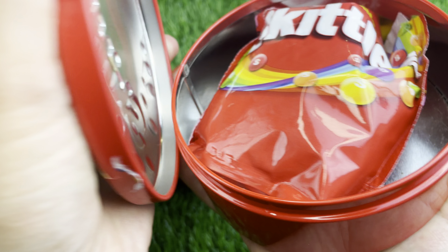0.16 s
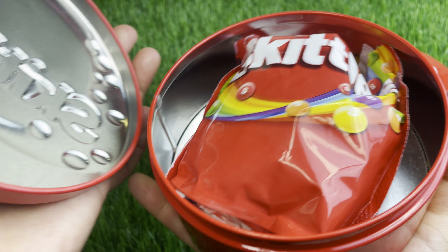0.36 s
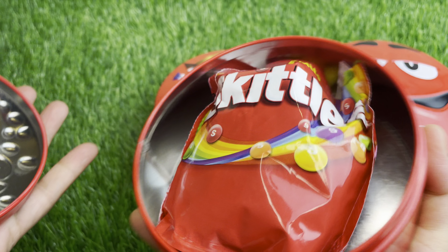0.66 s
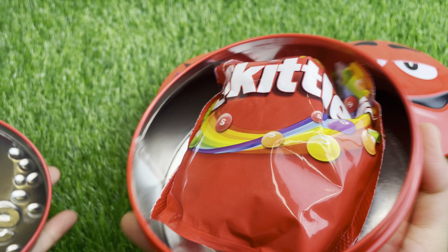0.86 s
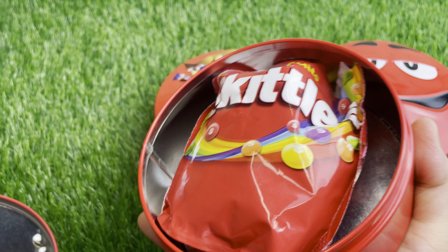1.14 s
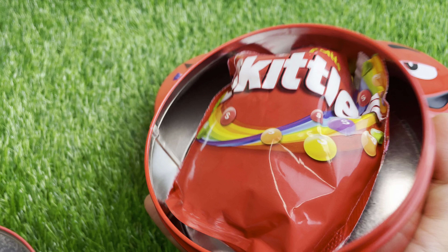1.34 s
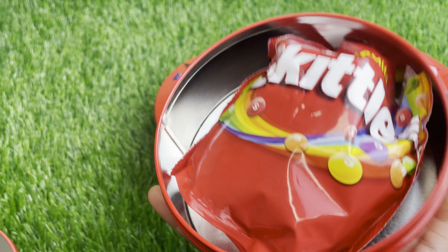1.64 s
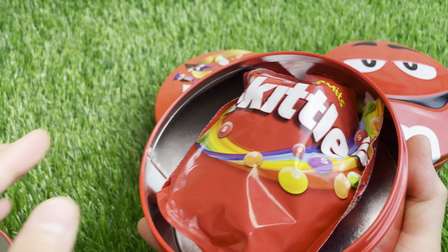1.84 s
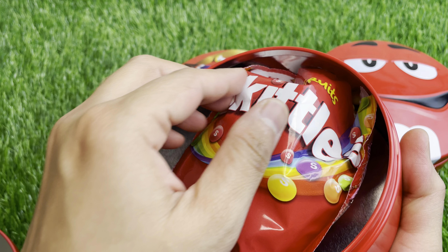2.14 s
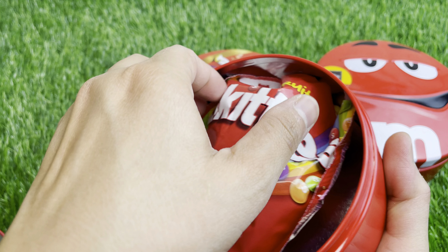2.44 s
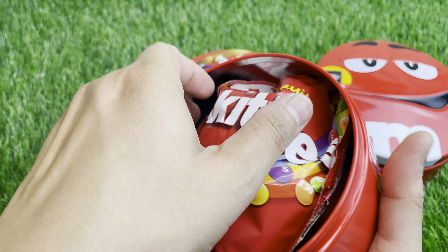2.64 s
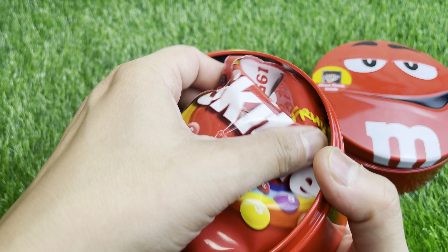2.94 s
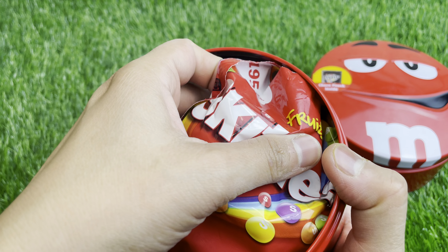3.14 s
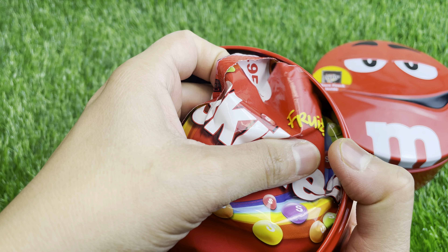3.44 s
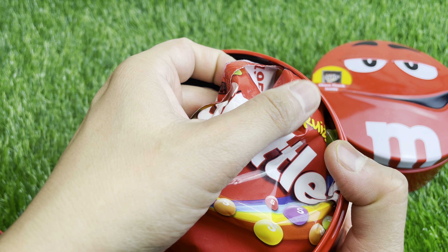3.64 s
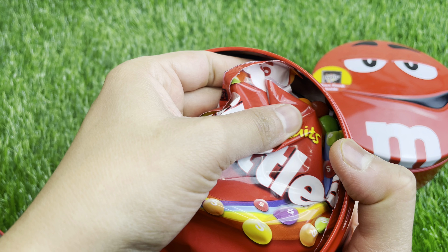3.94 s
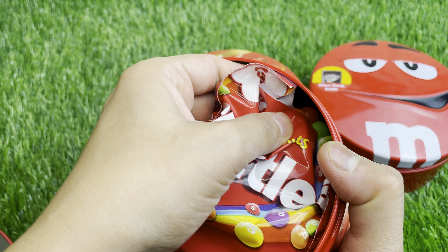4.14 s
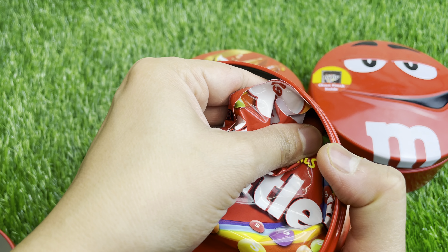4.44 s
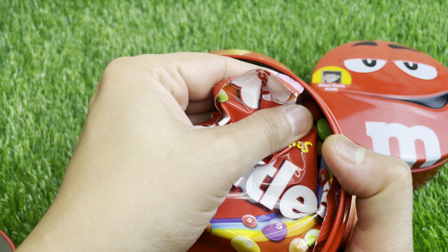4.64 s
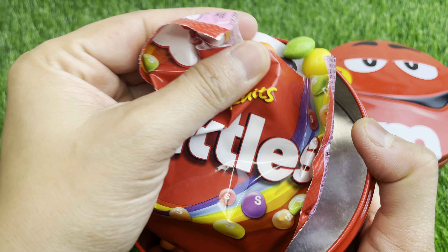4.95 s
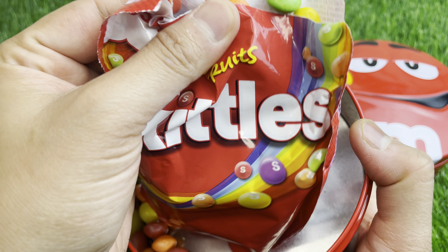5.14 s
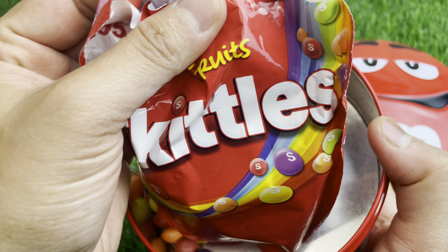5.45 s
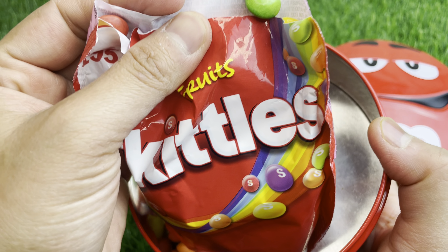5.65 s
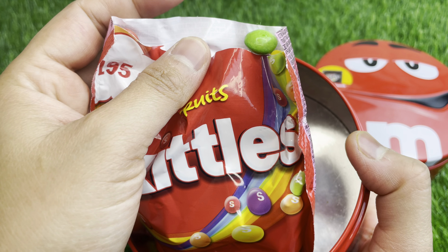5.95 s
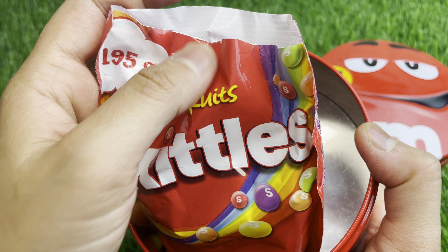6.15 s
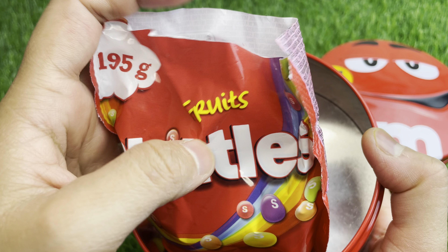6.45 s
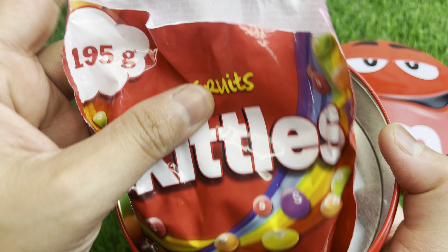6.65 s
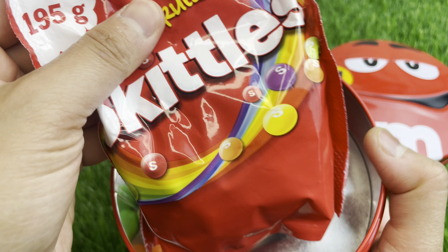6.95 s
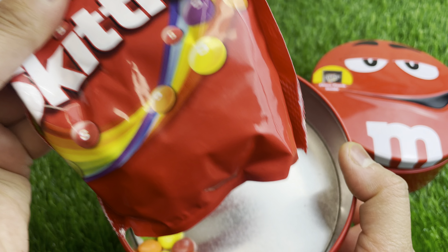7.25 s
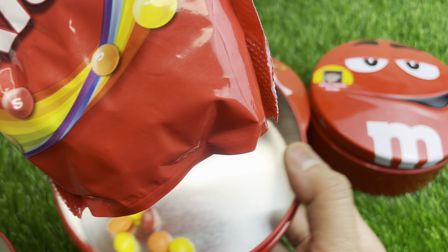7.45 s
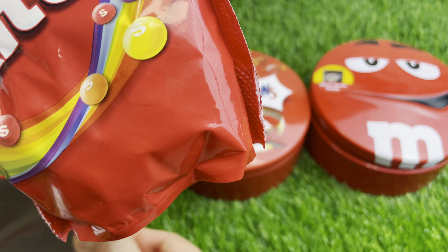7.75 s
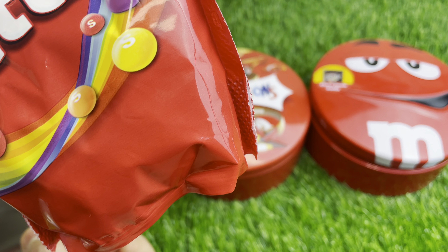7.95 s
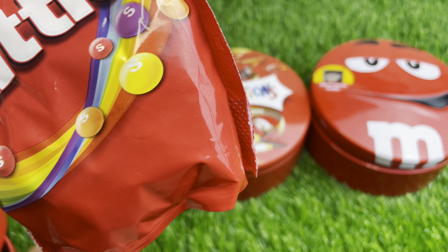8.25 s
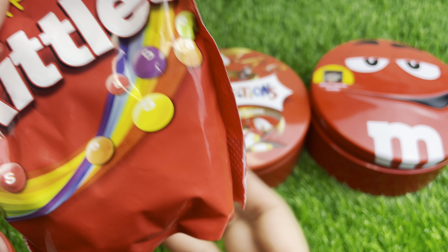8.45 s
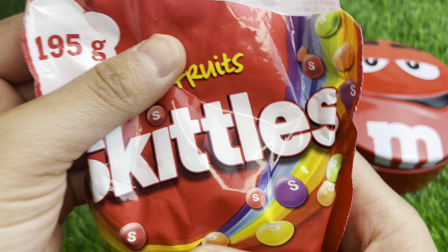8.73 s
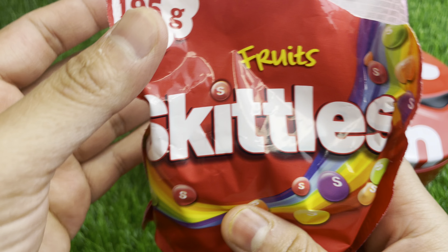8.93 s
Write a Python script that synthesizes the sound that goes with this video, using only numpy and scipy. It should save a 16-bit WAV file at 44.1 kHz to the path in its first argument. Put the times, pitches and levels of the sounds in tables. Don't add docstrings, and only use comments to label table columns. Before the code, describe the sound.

Very close in a small quiet room, a bag of hard sweets shifts in soft lumpy rustles inside a metal tin. After a near lull, squeezing makes dense sharp film snaps and hollow air pops. Sparser crinkles follow as the bag lifts, then sweets ping, clatter and briefly roll on the tin, with a few last crackles.

```python
import sys
import numpy as np
from scipy import signal
from scipy.fft import rfft, irfft, next_fast_len
from scipy.io import wavfile
from scipy.ndimage import uniform_filter1d

SR = 44100
rng = np.random.default_rng(int(sys.argv[2]) if len(sys.argv) > 2 else 0)


def volts(x):
    e = np.asarray(x, float) / 20
    return 10 ** e


def transcribe(u):
    v = np.clip(np.atleast_2d(u).T, -1, 1)
    q = np.round(v * 32767).astype(np.int16)
    wavfile.write(sys.argv[1], SR, q)


N = 400869

# [f/Hz, level/dB per Hz]
ROOM_TONE = [(18, -15), (30, 1), (81, 2), (141, -19), (616, -61.5), (1500, -56), (12600, -46), (16000, -75)]
# [f/Hz, level/dB per Hz]
RUB_COLOUR = [(20, -15), (60, -2.5), (110, 0.5), (250, -6), (420, -2), (900, -33)]
# [start t/s, hold t/s, level/dB]
RUBS = [(0, 0.3, -56), (0.453, 0.59, -50.5), (1.53, 0.23, -48), (2.47, 0.19, -53.5), (4.607, 1.6, -63),
        (5.47, 0.05, -47.5), (6.235, 0.038, -42), (6.583, 0.038, -36), (7, 1.9, -68), (8.817, 0.033, -43.5),
        (9.063, .03, -41)]
# [f/Hz, fall by 60 dB t/s]
ROOM_DECAY = [(300, 0.25), (2000, 0.17), (12000, 0.03)]
# [f/Hz, phase/rad]
LEFT_LEAD = [(700, .5), (1600, 2.4), (3600, 3.1), (4740, 7.4), (6550, 11.7), (7900, 9.7), (9300, 9.2),
             (13600, 6.3)]
# [f/Hz, level/dB]
LEFT_LOUDER = [(60, 2), (180, 3), (550, 7), (1000, 6), (2400, 1.5), (8000, 3), (9300, 0)]
# [f/Hz, width/Hz, depth 0-1]
HOUSING_DIPS = [(2200, 300, .3), (4000, 300, .35), (5600, 330, .62), (7500, 500, .25)]

# [t/s, level/dB, f/Hz]
THUMPS = [(0.512, -32, 420), (1.681, -34, 352), (1.879, -36.5, 493), (2.803, -39, 247), (3.084, -30.5, 340),
          (4.769, -38, 364), (4.83, -35.5, 456), (5.021, -31.5, 355), (5.239, -34.5, 374),
          (5.44, -36.5, 335), (5.583, -39.5, 370), (5.833, -38.5, 445), (5.933, -36, 353),
          (5.947, -41, 396), (6.603, -28, 410), (8.214, -31.5, 363), (8.867, -32, 348), (8.961, -38, 333),
          (9.051, -35, 330)]
# [t/s, rim level/dB, base level/dB re rim, wall level/dB re rim, fall by 60 dB t/s]
CLATTER = [(4.3314, -27, -8, -11, 0.09), (5.048, -42, -15, -15, 0.047), (6.7477, -37.5, -7, 6.5, 0.034),
           (6.915, -32.5, -22, -10, 0.068), (7.184, -29, -16, -12, 0.093), (7.481, -32, -20, -21, 0.065),
           (7.5434, -24, -29, -9, 0.061), (7.664, -33.5, -25, -19, 0.092), (7.731, -23.5, -40, -15, 0.076),
           (7.916, -27, -25, -18, .06), (7.9524, -26.5, 13.5, 0.5, 0.13), (7.9676, -38.5, 12, 14.5, 0.062),
           (8.02, -31.5, 12, 7, 0.12), (8.172, -31.5, 5, 5.5, 0.097), (8.2204, -24.5, 17.5, -2.5, 0.11),
           (8.2588, -30.5, 14, -11, 0.027), (8.455, -29.5, -6, -7.5, 0.085), (8.5223, -35, -7, -12.5, 0.13)]
# [start t/s, hold t/s, rim level/dB, base level/dB re rim]
ROLLS = [
    (6.734, 0.024, -47, -26),
    (7.454, 0.1, -44, -35),
    (7.852, 0.041, -32.5, -33),
    (8.12, 0.35, -46, 6),
    (8.46, 0.19, -53.5, -4),
    (8.72, 0.023, -52, -1),
]
# [f/Hz, width/Hz, level/dB]
RIM_MODES = [(861, 110, -16), (1880, 70, -17), (2760, 25, -9), (2868, 26, 1), (2960, 25, -3)]
# [f/Hz, width/Hz, level/dB]
BASE_MODES = [(363, 19, -4), (1062, 40, 3.5), (1370, 29, 17), (1510, 76, 6.5), (1600, 33, 0.5)]
# [f/Hz, width/Hz, level/dB]
WALL_MODES = [(1780, 28, -3), (2140, 42, 2.5), (2496, 38, 3), (2675, 39, 2.5), (2740, 23, -2.5),
              (3147, 41, 2.5), (3920, 60, 0), (6810, 48, -9)]
# [f/Hz, width/Hz, level/dB]
LOADED_BASE_MODES = [(1330, 32, 2), (1800, 65, -2), (2464, 37, -11), (3230, 60, -6)]
# [f/Hz, width/Hz, level/dB]
TILTED_BASE_MODES = [(1286, 44, 3), (1590, 68, 2), (1880, 60, -3.5), (2790, 46, -1.5)]
# [t/s, level/dB, f/Hz]
PINGS = [(4.333, -23.5, 2760), (4.397, -35, 2637), (5.05, -38, 2767), (5.265, -44, 2800),
         (6.914, -35, 2790), (7.545, -26, 2930), (7.556, -34, 2865), (7.733, -20, 2866), (7.844, -43, 2880),
         (7.893, -35, 2890), (7.953, -16, 1504), (7.953, -21, 2756), (7.954, -22, 3143), (7.968, -27, 2150),
         (8.018, -31, 3910), (8.04, -29, 2670), (8.15, -25, 2400), (8.224, -14.5, 1375), (8.225, -16, 2190),
         (8.39, -33, 1590), (8.455, -27, 2858), (8.521, -28, 2831), (8.522, -30, 1553), (8.55, -36, 2976),
         (8.694, -31.5, 2847)]
# [start t/s, length t/s, from f/Hz, to f/Hz, level/dB]
SWEEPS = [
    (8.041, 0.17, 2626, 2456, -36),
    (8.279, .2, 1383, 1627, -39),
]

# [f/Hz, level/dB per Hz]
FILM_COLOUR = [(800, -20.5), (3530, -13.5), (6400, -6.5), (7510, -8.5), (8960, -2), (12900, -1.5),
               (15300, -16), (16600, -42)]
# [f/Hz, level/dB]
BODY_COLOUR = [(1000, -51), (1400, -1), (2000, 2), (2600, 3), (4000, 0), (5500, -6.5), (6800, -6),
               (8000, -54)]
# [f/Hz, width/Hz, level/dB]
HOLLOW_MODES = [(395, 400, -9.5), (856, 254, 1), (1106, 400, -1)]
# [t/s, level/dB re body]
HOLLOW_ANSWER = [(2.4, 1.5), (3.0, 2.5), (3.4, -3.5), (3.95, -14.5), (4.3, 5.5), (5.1, 11.5), (5.35, 4),
                 (7.45, -5.5), (7.75, -15), (8.5, -16), (9.09, -1.5)]
# [start t/s, hold t/s, film level/dB, body level/dB re film]
GRIPS = [(0, 0.007, -52.5, -2), (0.207, 0.32, -57, 7.5), (0.526, 0.55, -36, -2), (1.242, 0.38, -51, 4),
         (1.535, 0.01, -25, -0.5), (1.674, 0.086, -32.5, -2), (1.849, 0.051, -60, 11),
         (2.16, 0.16, -59.5, 3.5), (2.449, 0.56, -50.5, 5.5), (2.921, .14, -41.5, 3),
         (3.142, 0.44, -44.5, 9), (3.56, 0.2, -30, 1.5), (3.751, 0.44, -41, 4.5), (4.302, 0.3, -69.5, 9),
         (4.688, 0.44, -50, -1.5), (5.22, 0.23, -66, 4), (5.454, 0.071, -37.5, -3.5), (5.69, 0.7, -55.5, 4),
         (6.582, 0.03, -32.5, 1.5), (6.69, 0.6, -44.5, -0.5), (7.409, 0.12, -43, 6.5),
         (7.815, 0.18, -40.5, 2), (7.624, 0.58, -54, 6), (8.018, 0.24, -42, 8.5), (8.252, 0.29, -51, 9.5),
         (8.531, 0.0091, -33, 2), (8.808, 0.18, -45, 0.5)]
# [t/s, peak level/dB, fall by 60 dB t/s]
SLIDES = [(0.039, -37.5, 0.036), (0.185, -26.5, 0.2), (0.2415, -32.5, 0.14), (0.3224, -26, 0.083),
          (0.366, -28, 0.39), (0.449, -19.5, 0.21), (0.515, -27, 0.11), (0.553, -19.5, 0.031),
          (0.5844, -13, 0.1), (0.6514, -20.5, 0.39), (0.686, -19.5, 0.21), (0.733, -24, 0.15),
          (0.787, -26, 0.083), (0.815, -21.5, 0.085), (0.852, -17.5, 0.15), (0.884, -14.5, 0.033),
          (0.924, -29.5, 0.29), (0.956, -27.5, 0.16), (1.014, -18, 0.11), (1.24, -25, 0.13),
          (1.301, -32, 0.67), (1.346, -25.5, 0.088), (1.44, -27, 0.36), (1.4974, -34, 0.081),
          (1.539, -15.5, 0.072), (1.573, -12.5, 0.052), (1.674, -28, 0.37), (1.7076, -21.5, 0.19),
          (1.734, -19, 0.2)]
# [t/s, level/dB, f/Hz]
POPS = [(2.197, -14, 996), (2.361, -13, 1240), (2.455, -18, 1110), (2.628, -13.5, 960), (2.936, -19, 880),
        (2.99, -16.5, 910), (3.009, -20, 850), (3.044, -19, 840), (3.062, -18.5, 860), (3.085, -15.5, 800),
        (3.214, -13.5, 810), (3.255, -7, 875), (3.297, -18, 846), (3.337, -10.5, 800), (3.382, -11, 780),
        (3.405, -16, 972), (3.432, -12.5, 880), (3.444, -10, 875), (3.468, -14.5, 900), (3.601, -13, 850),
        (3.624, -13, 850), (3.667, -22, 859), (3.692, -16, 830), (3.711, -13, 890), (3.761, -16, 880),
        (3.79, -14, 850), (3.803, -6.5, 860), (3.895, -10.5, 746), (3.953, -13, 795), (3.975, -17, 870),
        (4.675, -19, 905), (4.778, -14, 960), (4.789, -15.5, 860), (4.837, 1.5, 870), (5.024, -9, 870),
        (5.03, -10.5, 850), (5.044, -16, 816), (5.052, -13, 905), (5.245, -18, 965), (5.773, -21.5, 1050),
        (6.251, -22, 934), (6.466, -24, 1220), (6.56, -16, 970), (6.595, -10, 970), (6.672, -16.5, 980),
        (6.795, -19, 910), (7.668, -17, 910), (8.776, -19, 1030)]
# [t/s, level/dB, f/Hz]
PIPS = [(0.522, -17, 1014), (0.66, -15.5, 1090), (0.793, -16, 1140), (0.927, -16.5, 980),
        (2.197, -13.5, 2070), (2.361, -19, 2000), (2.628, -9.5, 1880), (2.691, -21, 3200),
        (2.715, -16.5, 1800), (3.255, -17, 1500), (3.299, -17, 1700), (3.338, -8.5, 1630),
        (3.382, -12, 1600), (3.405, -10, 1600), (3.445, -8.5, 1600), (3.602, -10, 1550), (3.628, -16, 1430),
        (3.67, -16, 1420), (3.742, -17, 1330), (3.804, -14, 1370), (3.906, -18, 1530), (4.04, -18, 1450),
        (4.06, -15.5, 1510), (4.102, -16, 1410), (4.331, -19, 1460), (5.047, -20, 1340),
        (6.892, -15.5, 1970), (6.999, -19, 2930), (7.185, -24, 1980)]
# [t/s, peak level/dB]
NICKS = [(.430, -25), (1.168, -31.5), (1.430, -27), (1.645, -25), (1.874, -28), (1.885, -26.5),
         (1.931, -34.5), (1.954, -38.5), (2.011, -45), (2.187, -41), (2.456, -31), (2.848, -21),
         (4.067, -15), (4.080, -21), (4.725, -34), (4.750, -30), (5.108, -29), (5.336, -45), (5.433, -30),
         (5.483, -24.5), (5.500, -26), (5.557, -27), (5.5948, -23), (5.714, -35), (5.751, -33),
         (5.875, -40), (5.949, -29), (6.037, -31), (6.097, -32), (6.250, -33), (6.291, -27), (6.366, -27),
         (6.431, -34.5), (6.497, -20), (6.559, -21.5), (7.155, -28), (7.338, -37), (8.546, -21),
         (8.775, -33), (8.830, -27), (8.860, -23), (8.952, -28)]
# [t/s, peak level/dB, fall by 60 dB t/s]
TICKS = [(2.465, -7.5, 0.013), (2.4986, -29, 0.015), (2.5545, -46, 0.024), (2.747, -48, 0.0083),
         (2.82, -23, 0.039), (2.957, -15, 0.025), (2.9935, -28, 0.017), (3.162, -12, 0.0089),
         (3.1806, -20, 0.027), (3.2083, -6, 0.017), (3.295, -15.5, 0.03), (3.3794, -7.5, 0.024),
         (3.432, -26, .015), (3.445, -13, 0.026), (3.468, -17, 0.018), (3.486, -15, 0.025),
         (3.5543, -20.5, 0.032), (3.599, -19.5, 0.12), (3.616, -18, 0.014), (3.637, -26, 0.02),
         (3.7388, -16, 0.017), (3.762, -23, 0.019), (3.803, -22, 0.012), (4.146, -26, 0.02),
         (4.163, -23, 0.022), (4.196, -26.5, 0.021), (5.5938, -27.5, 0.12), (5.733, -26.5, 0.029),
         (6.0134, -25, 0.053), (6.2645, -22, 0.14), (6.3508, -16, 0.014), (6.4886, -16, 0.014),
         (7.535, -19.5, 0.13), (7.662, -18.5, 0.13), (7.73, -21.5, 0.11), (7.8937, -21, 0.056),
         (8.4505, -24.5, 0.051), (8.52, -25, 0.041), (8.959, -23.5, 0.04), (9.0515, -26, 0.16)]
# [t/s, peak level/dB, fall by 60 dB t/s]
CRINKLES = [(3.122, -18.5, 0.07), (3.312, -3.5, 0.015), (3.277, -19, 0.019), (3.4213, -12, 0.085),
            (3.508, -10.5, 0.036), (3.7513, -17, 0.069), (3.953, -13.5, 0.085), (4.001, -12.5, 0.06),
            (4.036, -11, 0.045), (4.1, -13.5, 0.016), (4.33, -18, 0.12), (4.395, -13.5, 0.031),
            (4.7908, -14.5, 0.12), (5.983, -20, 0.016), (5.991, -23, 0.037), (6.06, -23, 0.026),
            (6.0775, -18.5, 0.015), (6.3129, -22, 0.0086), (6.664, -12.5, 0.014), (6.672, -13, 0.018),
            (6.716, -25, 0.16), (6.998, -14.5, .01), (7.184, -16.5, 0.09), (8.7481, -14, 0.0089)]
# [t/s, peak level/dB, fall by 60 dB t/s]
CREASES = [(2.592, -22.5, 0.094), (2.6779, -7.5, 0.019), (2.791, -29.5, 0.48), (2.9363, -11.5, 0.024),
           (3.0431, -21.5, 0.0072), (3.2534, -15, 0.076), (3.667, -25, 0.095), (3.906, -13.5, 0.061),
           (3.924, -20, 0.0092), (4.0624, -26, 0.035), (4.227, -24.5, 0.018), (4.5718, -29, 0.065),
           (4.6728, -25.5, 0.12), (4.8365, -13, 0.053), (4.975, -24.5, 0.062), (5.023, -13.5, 0.042),
           (5.2458, -17.5, 0.01), (5.403, -28, 0.11), (5.529, -14, 0.015), (5.924, -24.5, 0.063),
           (6.576, -28, 0.018), (6.604, -6.5, 0.015), (6.8925, -16, 0.0084), (7.2328, -24, 0.05),
           (8.69, -34, 0.41)]
# [t/s, peak level/dB, fall by 60 dB t/s]
FOLDS = [(2.194, -34, 0.032), (2.359, -44, 0.044), (2.628, -20.5, 0.025), (2.715, -27.5, 0.012),
         (2.8758, -15.5, 0.011), (3.336, -20.5, 0.045), (3.404, -10.5, 0.03), (3.702, -27.5, 0.017),
         (3.788, -23, 0.15), (3.894, -21.5, 0.044), (4.4808, -26.5, 0.012), (4.613, -19, 0.037),
         (4.767, -23, 0.15), (4.944, -23, 0.033), (5.045, -10, 0.024), (5.2106, -17.5, 0.058),
         (5.6994, -38, 0.048), (6.4658, -28.5, 0.028), (7.475, -27.5, 0.24), (7.8392, -33.5, 0.3),
         (7.951, -18.5, 0.027), (7.971, -18.5, 0.036), (8.016, -17.5, 0.14), (8.2119, -17.5, 0.03),
         (8.228, -22, 0.22), (8.8098, -18.5, 0.038), (8.867, -15.5, 0.02)]
# nicks, ticks,
# crinkles, creases, folds [level/dB re film]
BODY_SHARE = [-13, -19, -15, -9.5, -8]


def unit(x):
    return x / np.sqrt(np.mean(x ** 2) + 1e-20)


def along(points, hz):
    f, v = np.transpose(points)
    return np.interp(np.log(hz + 1), np.log(f + 1), v)


def filtered(x, response):
    m = next_fast_len(N + SR // 2)
    return irfft(rfft(x, m) * response(np.fft.rfftfreq(m, 1 / SR)), m)[..., :N]


def colour(points):
    return lambda hz: unit(volts(along(points, hz)))


def resonant(modes):
    def response(f):
        total = 0
        for k, (centre, width, db) in enumerate(modes):
            damping = 1j * f * width
            total = total + (-1) ** k * volts(db) * damping / (centre ** 2 - f * f + damping)
        return total / np.sqrt(np.mean(abs(total) ** 2))
    return response


def crackle(rate, spread_db, t60, bed):
    happens = rng.random(N) < rate / SR
    slips = happens * volts(spread_db * np.minimum(rng.exponential(size=N), 2))
    dying = signal.lfilter([1], [1, -volts(-60 / (t60 * SR))], slips)
    return unit(bed + unit(dying))


def bursts(s, db, t60, rise, tail_db):
    out, t = np.zeros(N + SR), np.arange(SR // 4) / SR
    for start, level, fall in zip(s, db, np.clip(t60, .008, .3)):
        fade = 60 * np.maximum(t - rise, 0) / fall
        shape = (volts(-fade) + volts(tail_db - fade / 4)) * np.minimum(t / rise, 1)
        out[round(start * SR):][:len(t)] += volts(level) * shape
    return out[:N]


def held(start, hold, db, swell, fade):
    t = np.arange(0, N + 64, 64) / SR
    start, hold, db = (np.asarray(v)[:, None] for v in (start, hold, db))
    level = db - swell * np.maximum(start - t, 0) - fade * np.maximum(t - start - hold, 0)
    return np.interp(np.arange(N) / SR, t, np.sqrt(np.sum(volts(2 * level), axis=0)))


def rough(spread, patchy_db):
    z = signal.stft(rng.standard_normal((2, N)), nperseg=256)[2]
    field = rng.standard_normal(z.shape[1:])
    field = uniform_filter1d(uniform_filter1d(field, size=4, axis=0), size=6, axis=1)
    hz = np.fft.rfftfreq(256, 1 / SR)
    scatter = 1 + 2.5 / (1 + (hz / 8600) ** 20)
    z = z * np.array([np.ones_like(scatter), scatter])[..., None]
    common, apart = signal.istft(z * volts(patchy_db * unit(field)), nperseg=256)[1][:, :N]
    return unit(common + spread * apart * [[1], [-1]])


def knocks(rows, gain_db, life):
    out, t = np.zeros(N + SR), np.arange(SR // 8) / SR
    for s, db, hz in rows:
        cycles = hz * t
        wave = cycles * np.exp(-cycles / life) * np.sin(2 * np.pi * cycles)
        out[round(s * SR):][:len(t)] += volts(db + gain_db) * wave
    return out[:N]


def background():
    noise = rng.standard_normal((2, 3, N))
    air, rub = noise[:, :2] * 0.7 + noise[:, 2:]
    lumps = held(*np.transpose(RUBS), swell=140, fade=117)
    lumps = lumps * crackle(rate=30, spread_db=2.5, t60=.1, bed=1)
    tone = volts(-65) * unit(filtered(air, colour(ROOM_TONE)))
    return tone + unit(filtered(rub, colour(RUB_COLOUR))) * lumps * volts([[-1.5], [-4.5]])


def room(x):
    hz, t, z = signal.stft(rng.standard_normal((2, SR // 2)), SR, nperseg=256)
    fall = volts(-60 * t / along(ROOM_DECAY, hz)[:, None])
    tail = signal.istft(z * fall, SR, nperseg=256)[1]
    late = np.pad(x, (60, 0))[None]
    return signal.fftconvolve(late, tail / np.linalg.norm(tail[0]), axes=1)[:, :N]


def ports(x):
    hz, lead = np.transpose(LEFT_LEAD)
    side = np.array([[.5], [-.5]])
    return filtered(x, lambda f: volts(side * along(LEFT_LOUDER, f)) * np.exp(1j * side * np.interp(f, hz, lead)))


def thumps():
    return knocks(THUMPS, gain_db=15, life=.8)


def tin():
    s, db, base_db, wall_db, t60 = np.transpose(CLATTER)
    roll_s, hold_s, rim_db, under_db = np.transpose(ROLLS)
    rim = held(roll_s, hold_s, rim_db, swell=140, fade=114)
    base = held(roll_s, hold_s, rim_db + under_db, swell=140, fade=114)
    tilt = np.clip((np.arange(N) / SR - 8.28) / .15, 0, 1)
    parts = [(RIM_MODES, db - 5.5, rim),  # (modes, strike level/dB, rolling gain)
             (BASE_MODES, db + base_db - 6.5, 0),
             (WALL_MODES, db + wall_db + 5.5, 0.14 * base),
             (LOADED_BASE_MODES, db - 90, volts(1.5) * base * (1 - tilt)),
             (TILTED_BASE_MODES, db - 90, volts(1.0) * base * tilt)]
    hail = crackle(rate=250, spread_db=3, t60=.006, bed=.7) * rough(spread=.2, patchy_db=1.5)
    out = 0
    for modes, level, rolling in parts:
        strikes = bursts(s, level, t60, rise=0.00026, tail_db=-19.0)
        out = out + filtered((strikes + rolling) * hail, resonant(modes))
    return out


def pings():
    out, t = np.zeros((2, N + SR)), np.arange(SR // 4) / SR
    right = volts([[0], [-6]])
    lags = 1.3 + .6 * rng.standard_normal(len(PINGS))
    for (s, db, hz), lag in zip(PINGS, lags):
        fall = volts(db - 60 * t / .18) * np.minimum(t / 0.00086, 1)
        wave = np.sin(2 * np.pi * hz * t + [[0], [lag]])
        out[:, round(s * SR):][:, :len(t)] += right * fall * wave
    for s, length, from_hz, to_hz, db in SWEEPS:
        u = np.minimum(t / length, 1)
        fuzz = unit(uniform_filter1d(rng.standard_normal(len(t)), size=500))
        swell = np.sin(np.pi * u) ** .5 * (1 + fuzz)
        wave = np.sin(2 * np.pi * np.cumsum(from_hz + (to_hz - from_hz) * u) / SR)
        out[:, round(s * SR):][:, :len(t)] += right * volts(db) * swell * wave
    return out[:, :N]


def air_pops():
    return knocks(POPS, gain_db=-0.5, life=1.145) + knocks(PIPS, gain_db=2.0, life=1.54)


def rustle_gains():
    start, hold, film_db, body_db = np.transpose(GRIPS)
    film = held(start, hold, film_db, swell=320, fade=161)
    body = held(start, hold, film_db + body_db, swell=320, fade=161)
    answer = volts(np.interp(np.arange(N) / SR, *np.transpose(HOLLOW_ANSWER)))
    return film, body, body * answer


def bag():
    kinds = ([(s, db, .012) for s, db in NICKS], TICKS, CRINKLES, CREASES, FOLDS)
    snap_s, snap_db, snap_t60 = np.concatenate(kinds).T
    body_db = np.repeat(BODY_SHARE, [len(kind) for kind in kinds])
    snap_parts = [0, body_db, body_db - 8.0]
    slide_s, slide_db, slide_t60 = np.transpose(SLIDES)
    slide_parts = [0, -9.5, -16 - .45 * (slide_db - slide_db.mean())]

    strain = np.bincount(np.round((snap_s - .011) * SR).astype(int), None, N)
    hush = volts(-9 * np.minimum(signal.fftconvolve(strain, np.hanning(1100), "same"), 1))
    ticks = crackle(rate=110, spread_db=3.2, t60=.008, bed=.6)
    splinter = crackle(rate=220, spread_db=1.7, t60=.005, bed=1)

    layers = [(colour(FILM_COLOUR), -7, .17, 1, 1.5),  # (response, level/dB, spread, tickiness, crack/dB)
              (colour(BODY_COLOUR), 1.5, .2, .8, 9),
              (resonant(HOLLOW_MODES), 2.5, .1, .4, 3)]
    out = air_pops()
    for layer, gain, snap_part, slide_part in zip(layers, rustle_gains(), snap_parts, slide_parts):
        response, offset_db, spread, tickiness, crack_db = layer
        slips = crackle(rate=130, spread_db=2.5, t60=0.056, bed=2.2)
        rustle = gain * hush * unit(ticks ** tickiness * slips)
        snaps = bursts(snap_s, snap_db + offset_db + snap_part, snap_t60, rise=0.00071, tail_db=-18)
        slides = bursts(slide_s, slide_db + offset_db + slide_part, slide_t60, rise=0.0079, tail_db=-51.0)
        shape = rustle + splinter * snaps + slides
        grain = crackle(rate=800, spread_db=-1.0, t60=0.01, bed=1.0)
        crack = volts(snap_db + snap_part + crack_db) * (.025 / snap_t60) ** 1.5
        first = np.bincount(np.round(snap_s * SR).astype(int), crack, N)
        out = out + filtered(shape * grain * rough(spread, patchy_db=2.5) + first, response)
    return out


def scene():
    film = bag()
    metal = tin() + thumps()
    notes = pings()
    echo = room(volts(-14.5) * film[0] + volts(-10) * (metal + notes)[0])
    near = ports(film + metal) + notes + echo
    return filtered(near, lambda hz: (1j * hz / (150 + 1j * hz)) ** 2) + background()


def top_cut(x):
    return signal.sosfilt(signal.butter(12, 16970, fs=SR, output="sos"), x)


def record(dry):
    def microphone(hz):
        response = 1j * hz / (45 + 1j * hz) / np.sqrt(1 + (hz / 16100) ** 60)
        for centre, width, depth in HOUSING_DIPS:
            damping = 1j * hz * width
            response = response * (1 - depth * damping / (centre ** 2 - hz * hz + damping))
        return response
    heard = filtered(dry, microphone)
    heard = heard / (1 + abs(heard / .9) ** 4) ** .25
    return top_cut(heard)


dry = scene()
out = record(dry)
transcribe(out)
```